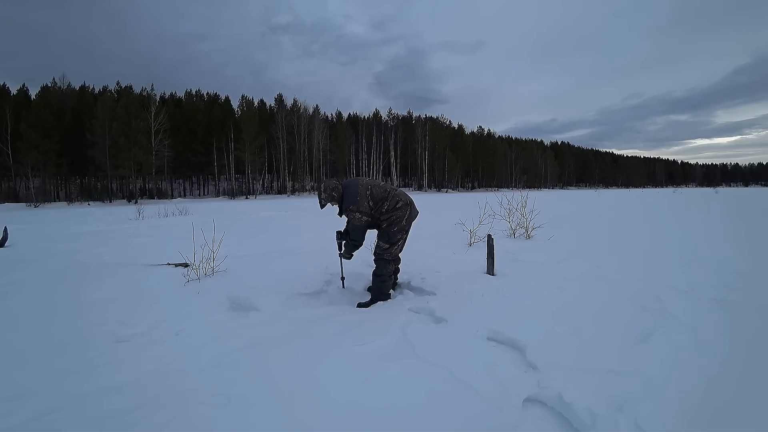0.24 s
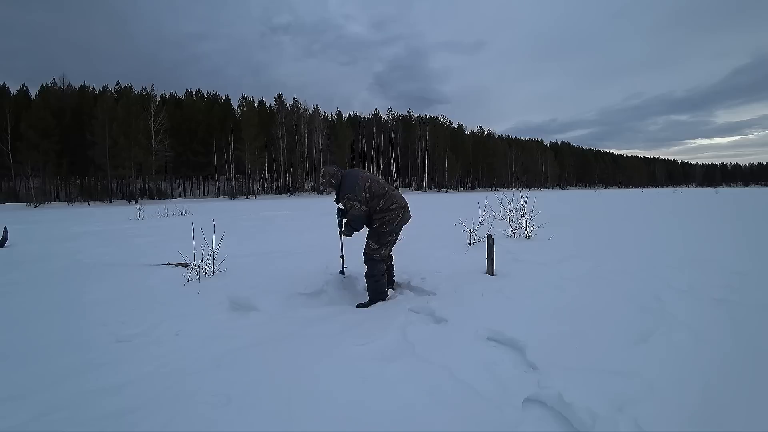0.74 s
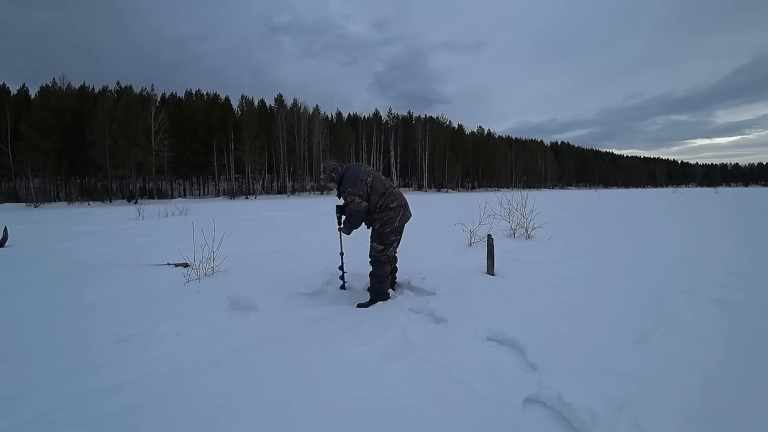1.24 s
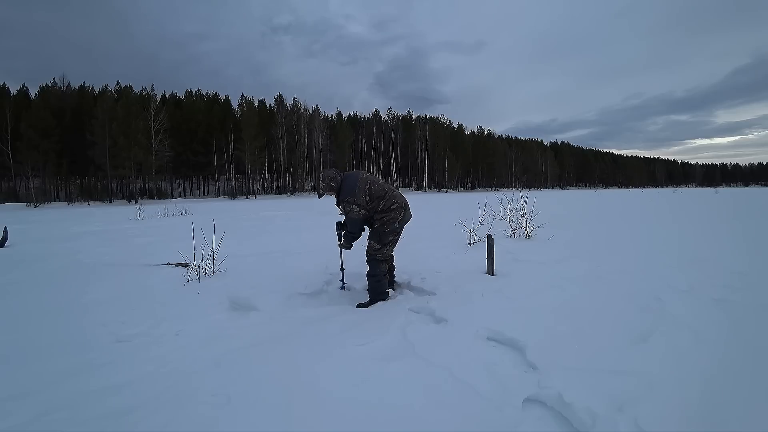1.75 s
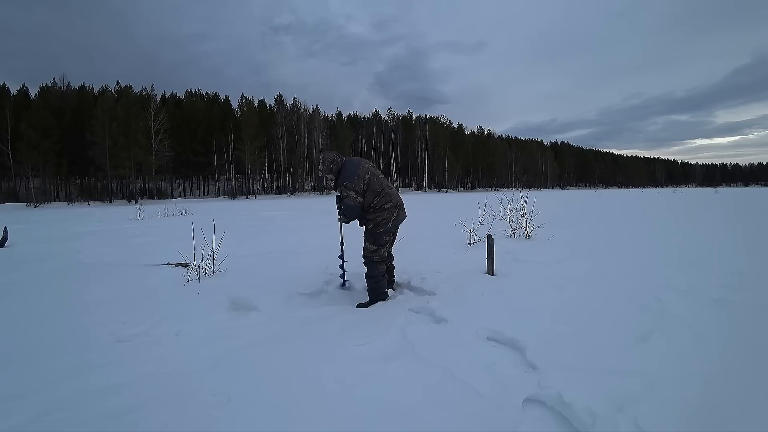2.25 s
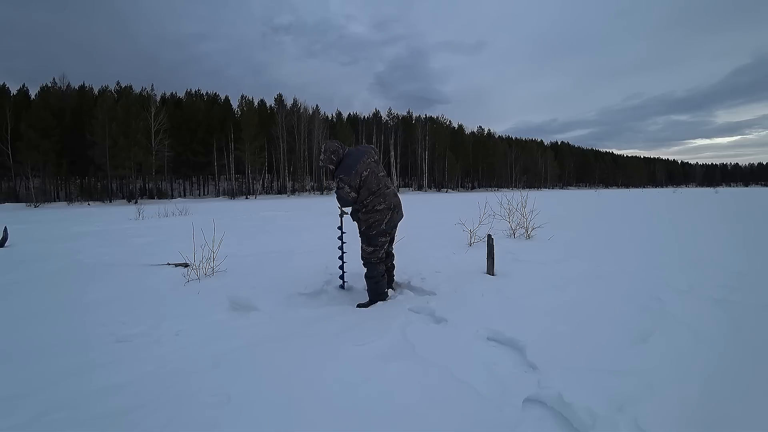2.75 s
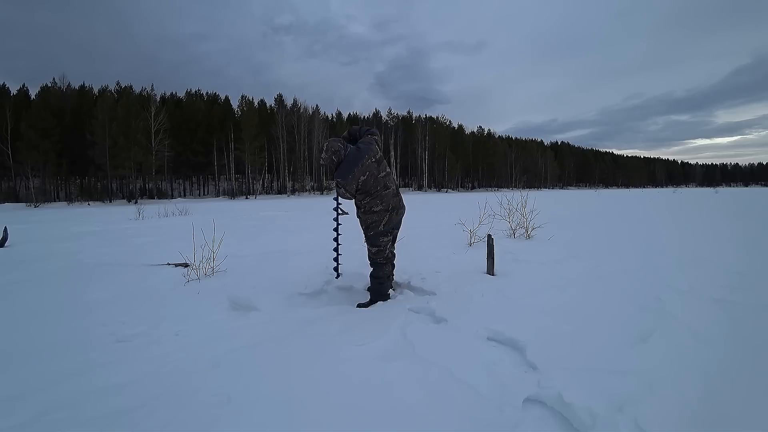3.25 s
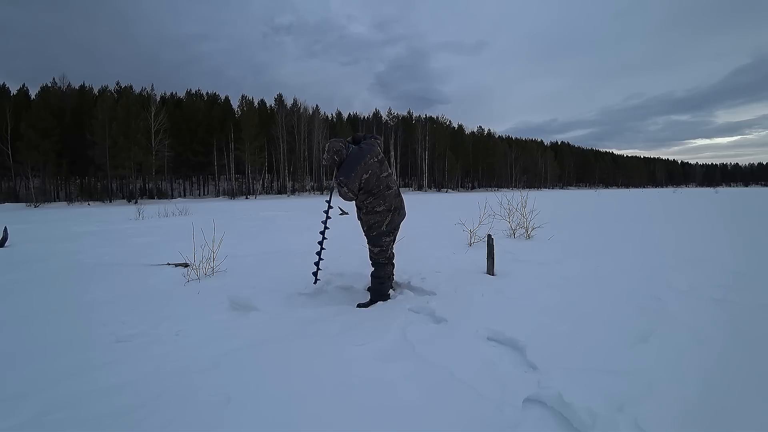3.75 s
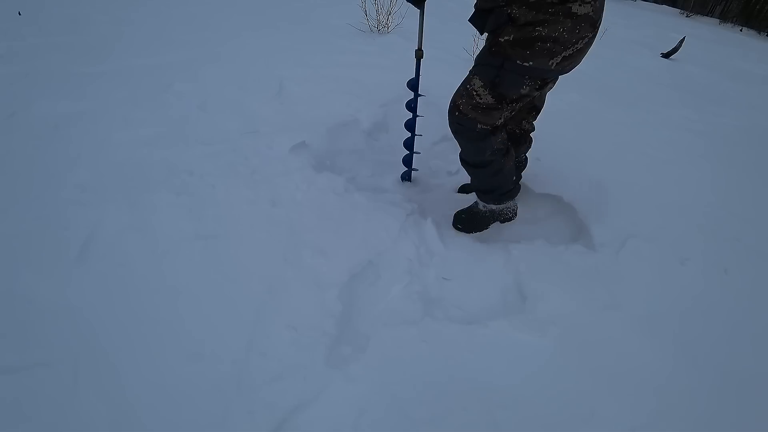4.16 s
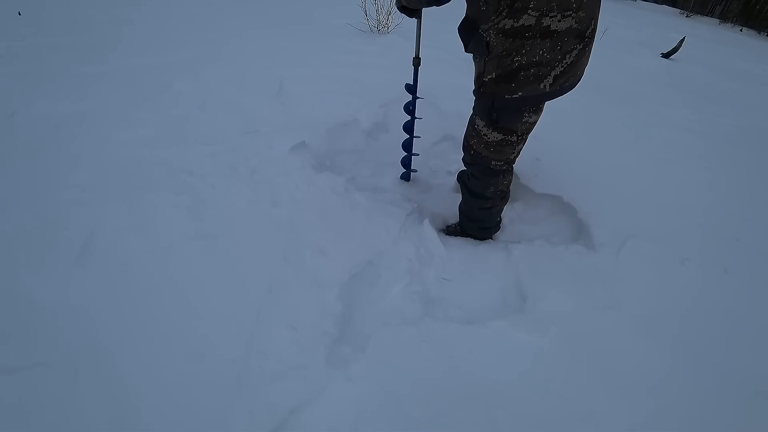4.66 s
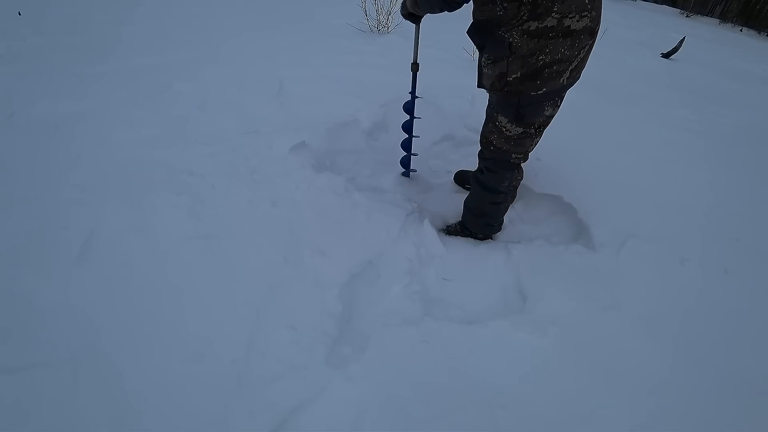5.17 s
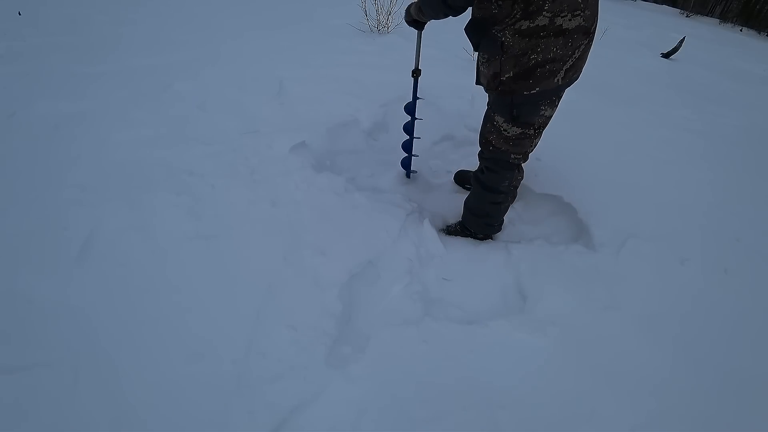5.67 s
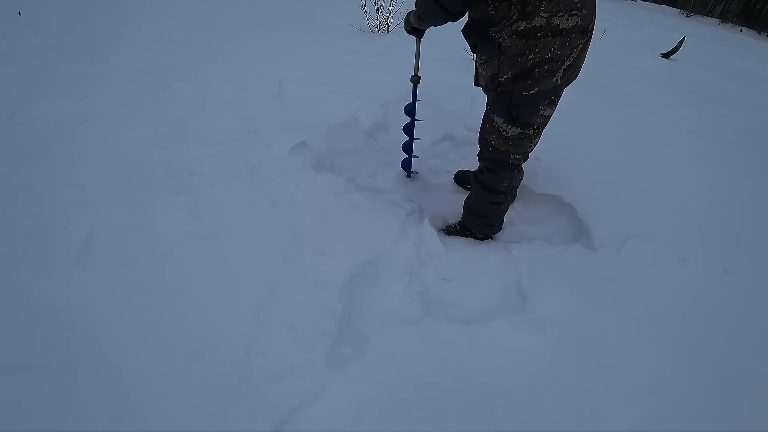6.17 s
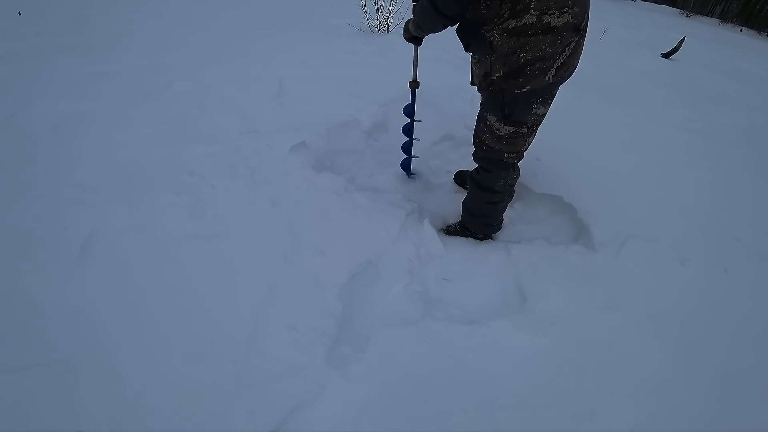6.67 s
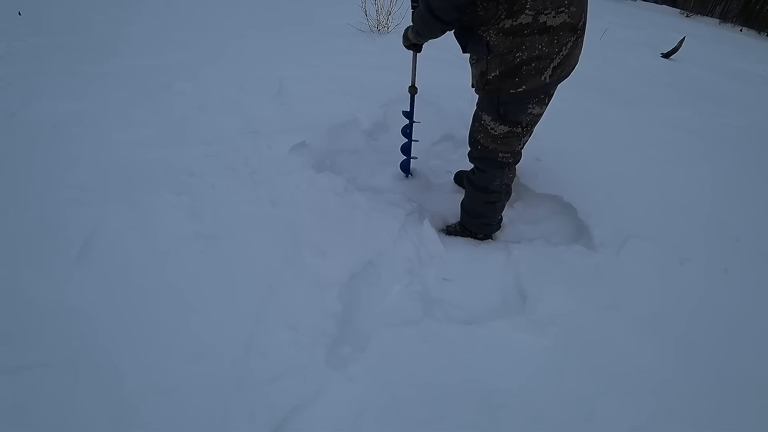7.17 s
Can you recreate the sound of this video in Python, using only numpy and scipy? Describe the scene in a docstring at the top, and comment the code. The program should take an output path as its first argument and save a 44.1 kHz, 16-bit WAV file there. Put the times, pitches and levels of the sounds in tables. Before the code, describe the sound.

An open, snowy lake with light wind rumble and very faint hiss. From a few metres away, a cordless drill whirs briefly at 0.0-0.2 s and again at 0.4-0.65 s, its gear whine rising fast and dropping as it brakes, with a few clicks. Wet slush splashes gather from 0.6 s, strongest and crunchiest around 1.2 s, with small bubbly plops. A longer whir at 1.65-2.4 s churns more watery, gritty bursts, peaking near 2.4 s. From 2.6 to 4.0 s it quiets to water pattering off the auger, light ticks and thinning drips. At 4.05 s it cuts abruptly to a close, far louder sound: continuous coarse ice shaving, a wobbling, raspy motor whine, low rumble and metallic ringing. From about 5.55 to 6.9 s, six fuzzy rising squeals repeat roughly four per second. Grinding continues, slightly easing, to the end near 7.4 s.

```python
"""Drill-driven ice auger

A cordless drill turns an ice auger on a frozen lake, in light wind.
From a few metres off, three motor bursts (swept gear and motor sines, fan noise) churn slush in a hole:
noise bursts for splashes, short gliding sines for bubbles, pattering noise for water off the auger.
Then, suddenly close, the drill runs under load (wobbling gear sines) while the blades shave fresh ice
(gritty noise, rung resonances); six squeals, one per auger turn, are rising fuzzy tones."""
import sys
import numpy as np
from scipy import signal
from scipy.fft import rfft, irfft
from scipy.io import wavfile
from scipy.ndimage import uniform_filter1d

SR = 44100
rng = np.random.default_rng(int(sys.argv[2]) if len(sys.argv) > 2 else 0)


def materialize(psi):
    """Save the field psi as 16-bit PCM at rate SR to the path in sys.argv[1].

    A 1-D psi becomes a single channel; in a 2-D psi each row is a channel.
    """
    bounded = np.clip(np.atleast_2d(psi).T, -1, 1)
    quanta = np.round(bounded * 32767).astype(np.int16)
    wavfile.write(sys.argv[1], SR, quanta)


N = 326781
TIME_S = np.arange(N) / SR
CLOSE_S = 4.049  # the close view begins
EDGE_HZ = 11030

# Table levels are nominal: the functions add trims and fluctuation.
# Spectra, each row: frequency in Hz, relative density in dB per Hz.

# Trigger pulls. Each row: half speed reached in seconds, let go in seconds, top gear-mesh pitch in Hz,
# sag as the finger eases (0-1), level in dB, gear whine in relative dB, brake current in relative dB.
BURSTS = [(0.022, 0.213, 3306, 0.12, -41.5, -8, 15), (0.388, 0.651, 3215, 0.11, -41, -6, 8),
          (1.669, 2.378, 3234, .13, -41, -9, 0)]
# Gear partials. Each row: multiple of the gear-mesh pitch, level in dB.
GEAR_PARTIALS = [(1 / 12, -8), (1 / 4, -9), (11 / 12, -10), (1 / 3, -8), (1, 1.5), (4 / 3, -7), (5 / 3, -7),
                 (2, -8)]
# Magnetic whine of the motor. Each row: multiple of the gear-mesh pitch, level in dB.
MOTOR_PARTIALS = [(1 / 3, -17.5), (2 / 3, -20.5), (13 / 12, -21), (4 / 3, -17), (3 / 2, -26), (7 / 4, -15)]
# Motor case response. Each row: frequency in Hz, gain in dB.
MOTOR_CASE = [(400, -11.5), (680, -13.5), (950, 2.5), (1300, -9), (1900, -4.5), (2900, 3), (3700, -7.5),
              (6000, -5)]
# Fan and brush spectrum. Each row: frequency in Hz, density in dB per Hz.
WHIRR_SPECTRUM = [(120, -52), (200, -9.5), (266, -11), (325, -18), (538, -8), (904, -13.5), (1050, -6.5),
                  (1200, -10.5), (1860, -13), (2060, -15.5), (2430, -8.5), (3130, -3.5), (3640, -2.5),
                  (5170, 1.5), (6600, -2), (7800, -15.5), (11000, -20), (14300, -51), (22000, -120)]
# Speed controller resonances. Each row: frequency in Hz, width in Hz, level in dB.
CHOPPER_MODES = [(2450, 300, 1), (4260, 1100, -4)]
# Drill under load. Each row: time in seconds, gear-mesh pitch in Hz,
# levels of the first, second and third partial in dB.
LOADED = [(4.05, 2570, -48, -41, -39.5), (4.55, 2573, -44, -56, -43), (4.95, 2580, -50, -36.5, -37),
          (5.35, 2560, -45.5, -44, -36.5), (5.53, 2546, -40, -39, -38), (5.7, 2566, -41, -39, -40),
          (6.45, 2566, -41.5, -36, -38), (7., 2541, -45, -39.5, -47), (7.41, 2514, -42.5, -38, -53)]

# Ice shaving spectrum. Each row: frequency in Hz, density in dB per Hz.
SCRAPE_SPECTRUM = [(200, -11.5), (400, -9), (750, -14), (1100, -6), (1500, -7), (1850, -9), (2300, -4),
                   (2700, -3), (3050, -0.5), (3250, -6), (3450, -0.5), (5400, -1), (6500, -2.5), (7500, -5),
                   (8800, -7.5), (9700, -14.5), (11000, -14)]
# Auger bending modes. Each row: frequency in Hz, width in Hz, level in dB.
AUGER_MODES = [(867, 9.6, -12.5), (984.5, 30, -3.5), (1209, 34, -5.5)]
# Blade resonances. Each row: frequency in Hz, width in Hz, level in dB.
BLADE_MODES = [(4380, 430, -4), (4869, 150, -5.5), (5370, 190, -6.5), (5900, 120, -25)]
# Blade ringing. Each row: time in seconds, level in dB.
BLADE_RING = [(4.05, -64), (4.9, -38.5), (5.5, -36), (6.5, -43.5), (6.8, -36.5), (7.41, -33)]
# Low rumble spectrum. Each row: frequency in Hz, density in dB per Hz.
RUMBLE_SPECTRUM = [(12, -35), (20, -1), (107, 2.5), (188, 1), (375, -13), (420, -13), (550, -17),
                   (920, -120)]
# Ground rumble. Each row: time in seconds, level in dB.
GROUND_RUMBLE = [(4.05, -35), (4.25, -37.5), (4.6, -44.5), (5.05, -38.5), (5.5, -42), (6.4, -46.5),
                 (6.85, -43.5), (7.3, -41)]
# Boring sounds as the blades sink in. Each one: level at the start in dB, change in dB per second.
CUTTING = (-25.5, -0.68)
AUGER_RINGING = (-38, -2.1)
SHAFT_HUM = (-47, 1.43)

# Big clumps of slush thrown by the auger. Each row: start in seconds, spray peak in dB,
# watery low part in relative dB, icy snap in relative dB, spray rise time in seconds.
SPLASHES = [(.207, -45.5, -2.5, -29, 0.011), (.618, -42, -7, -30, 0.011), (.7015, -44.5, 0, -25, 0.0093),
            (.725, -38.5, -13, -28, 0.01), (0.822, -39.5, -7.5, -26, 0.0087), (0.856, -46, -4, -22, 0.0077),
            (0.907, -37, -13, -8, 0.0041), (.934, -42, -8, -25, 0.0054), (1.069, -49, -13, -9, .005),
            (1.091, -41, -28, -10.5, 0.0067), (1.111, -37.5, -11, -7, 0.008),
            (1.163, -33.5, -15, -13, 0.0053), (1.2, -30, -15.5, -7.5, 0.0096),
            (1.245, -33.5, -10.5, -7, 0.0085), (1.2925, -32.5, -9.5, -22, 0.0075),
            (1.335, -37, -9, -23, 0.013), (1.372, -46, 6, -24, 0.0077), (1.446, -43.5, 4.5, -22, 0.0066),
            (1.477, -43, -1, -20, 0.0083), (1.749, -36, -4, -23, 0.0069), (1.882, -34, -6, -24, 0.016),
            (1.993, -36.5, -10, -34, 0.011), (2.061, -32, -10.5, -28, 0.0093),
            (2.107, -34, -3.5, -26, 0.01), (2.141, -32, -17, -33.5, 0.0075), (2.259, -40, -11, -23, 0.0099),
            (2.305, -33.5, -9.5, -22, 0.0092), (2.338, -33, -18, -22, 0.0089),
            (2.375, -27, -12, -29, 0.011), (2.411, -35, -4.5, -26, 0.018), (2.461, -30, -12, -28, 0.0087),
            (2.49, -36, -12, -26, 0.01), (2.584, -36.5, -16, -23, 0.0095)]
# Spells in which the flights fling small clumps. Each row: start in seconds, stop in seconds.
CHURN = [(.5, .79), (1.25, 1.6), (1.801, 2.56)]
# Spray spectrum. Each row: frequency in Hz, density in dB per Hz.
SPRAY_SPECTRUM = [(710, -18), (1200, -1.5), (1530, -3), (1640, -2), (2070, 1.5), (2640, 0.5), (3300, 5.5),
                  (3750, -2), (4600, 2.5), (6430, -5.5), (8720, -15), (9480, -20), (11000, -15.5),
                  (14300, -49), (22000, -120)]
# Spectrum of the water in the hole. Each row: frequency in Hz, density in dB per Hz.
SLOP_SPECTRUM = [(71, -32), (120, -1), (273, 2), (386, -5), (515, 3.5), (836, 2), (1040, 4.5), (1650, -3.5),
                 (1900, -18), (2470, -26), (4180, -120)]
# Largest air pockets and drips in the hole. Each row: start in seconds, initial pitch in Hz, peak in dB.
BUBBLES = [(.056, 199, -45.5), (.644, 813, -46), (.936, 1570, -39), (1.172, 1160, -34.5),
           (1.208, 1404, -34), (1.362, 247, -45.5), (1.384, 526, -48), (1.478, 750, -42),
           (1.811, 1620, -37), (2.073, 1316, -37), (2.117, 613, -40.5), (2.382, 1330, -33.5),
           (2.418, 1490, -39), (2.465, 1224, -38), (2.605, 1280, -33), (2.608, 948, -44),
           (3.374, 1020, -58), (3.508, 1100, -59)]
# Clicks of trigger, chuck and ice chips. Each row: start in seconds, level in dB.
TICKS = [(.268, -40), (.3243, -46), (.6736, -37.5), (1.642, -42), (2.687, -44), (2.9243, -47), (3.302, -45),
         (3.3286, -50), (3.416, -48), (3.509, -47.5), (3.562, -45)]
# Surges of water and slush off the auger. Each row: start in seconds, length in seconds, level in dB.
RUNOFF = [(-.1, 0.31, -49), (0.693, .29, -49), (1.11, 0.26, -42.5), (1.71, 0.81, -43.5),
          (2.544, 0.16, -48.5), (2.704, .1, -46.5), (2.8, .17, -51), (3.137, 0.21, -53.5),
          (3.36, 0.11, -54.5)]
# Running water spectrum. Each row: frequency in Hz, density in dB per Hz.
TRICKLE_SPECTRUM = [(290, -33), (500, -1.5), (623, -5.5), (817, -4), (1130, 1.5), (1430, -1.5), (2300, 2),
                    (4750, 4), (5060, 5), (7000, -5.5), (11000, -7.5), (14300, -43), (22000, -120)]

# Wind spectrum. Each row: frequency in Hz, density in dB per Hz.
WIND_SPECTRUM = [(8.8, -44), (15, -2), (38, -2), (91, -7.5), (158, -17.5), (209, -31), (222, -24),
                 (300, -29.5), (390, -65), (660, -120)]
# Gusts. Each row: time in seconds, level in dB.
GUSTS = [(0, -59.5), (.8, -54.5), (1.2, -55), (2.25, -55), (2.5, -50), (3.55, -56), (3.68, -49),
         (4.02, -54)]
# Hiss spectrum. Each row: frequency in Hz, density in dB per Hz.
HISS_SPECTRUM = [(120, -24), (200, 0.5), (229, -15.5), (372, -9), (404, -3), (433, -9), (752, -17.5),
                 (5170, -34), (6650, -34), (8130, -26), (11000, -41), (14300, -71), (22000, -120)]
# Two microphone ports, one entry per view. Three lists of rows: frequency in Hz, likeness (clipped to 0-1);
# frequency in Hz, lead of the left in radians; frequency in Hz, left minus right in dB.
FAR_PORTS = ([(60, 1), (170, 0.55), (500, 0.85), (1420, 1.2), (4080, 1.2), (11700, 1)], [(0, -1),
             (520, 0.61), (5940, 0.21), (7580, 0.65), (11900, -1)], [(60, 0.5), (170, 2.5), (500, 2),
             (1420, 1.5), (4080, 1), (11700, 1.0)])
CLOSE_PORTS = ([(60, 1), (140, 0.96), (350, 0.33), (840, 0.9), (2020, 0.93), (4870, 1), (11700, 0.74)],
               [(0, -1.3), (340, 1.23), (600, 0.3), (950, 0.3), (9730, -0.42), (10600, -0.1), (11900, 0.0)],
               [(60, 0.5), (140, 1.0), (350, 0.63), (840, 0.87), (2020, 0.13), (4870, 0.76), (11700, -1.7)])

# Speed climbs an S-curve, sags late, dies away under the brake.
SPIN_UP_S, BRAKE_S, SAG_POWER = .027, 0.056, 4.1
# Level grows with speed, and again while the motor accelerates.
LOUDNESS_POWER, SURGE_DB = 2.2, 11
IDLE_CURRENT_DB, START_CURRENT_DB = -2, 4.5  # motor whine, running free and starting
SHAFT_DB = -13.5  # each of the weaker multiples of the shaft speed
MESH_PER_SHAFT = 12  # gear-mesh cycles per shaft turn
PULL_S, CHOPPER_DB = .057, -55.5  # buzz from the trigger pull, fading through half speed
SQUEAL_FROM_S, AUGER_TURN_S, SQUEAL_S = 5.55, .237, .19
SQUEAL_START_HZ, SQUEAL_END_HZ, SQUEAL_DB = 2713, 3060, -38
SMALL_PER_S, SMALL_SPREAD_DB = 17.73, 8  # small clumps
SMALL_LOW_DB, SMALL_SNAP_DB, SMALL_RISE_S = -7, -15, 0.0079
TICK_DECAY_S = 0.005
FLOW_ATTACK_S, FLOW_RELEASE_S = 0.05, 0.078
DRIP_DB, DRIP_END_S = -57.5, 3.58  # dripping weakens as the auger is swung clear of the hole
HISS_DB = -68.5
SCATTER_S = 0.042  # decay of the scatter off the snow


def amp(db):
    """Decibels to gain."""
    return 10 ** (np.asarray(db) / 20)


def unit(x):
    """Scales to rms 1."""
    return x / np.sqrt(np.mean(x ** 2) + 1e-20)


def curves(rows):
    """Interpolates each column of a table of (s, ..) rows at every sample."""
    row_s, *columns = np.transpose(rows)
    return [np.interp(TIME_S, row_s, column) for column in columns]


def over_log_hz(hz, rows):
    """Interpolates (Hz, value) rows on a near-logarithmic frequency axis."""
    row_hz, values = np.transpose(rows)
    return np.interp(np.log1p(hz), np.log1p(row_hz), values)


def colour(x, spectrum):
    """Filters by a spectrum of (Hz, dB) points."""
    hz = np.fft.rfftfreq(N, 1 / SR)
    return irfft(rfft(x) * amp(over_log_hz(hz, spectrum)), N)


def wander(rate_hz):
    """Slow random signal of rms 1, up to about the given rate."""
    hz = np.fft.rfftfreq(N, 1 / SR)
    lowpass = (hz > 0) / (1 + (hz / rate_hz) ** 4)
    return unit(irfft(rfft(rng.standard_normal(N)) * lowpass, N))


def patchy_noise(patchy_db, size):
    """White noise whose level varies in patches of size (bins, frames)."""
    bins = signal.stft(rng.standard_normal(N), nperseg=256, noverlap=192)[2]
    patches = uniform_filter1d(rng.standard_normal(bins.shape), size[0], axis=0)
    patches = uniform_filter1d(patches, size[1], axis=1)
    noise = signal.istft(bins * amp(patchy_db * unit(patches)), nperseg=256, noverlap=192)[1]
    return unit(noise[:N])


def crackle(per_s, spread_db):
    """Sparse clicks, a few much larger than the rest."""
    sizes = amp(spread_db * np.minimum(rng.exponential(1, N), 4))
    signs = rng.choice([-1, 1], N)
    return unit(sizes * signs * (rng.random(N) < per_s / SR))


def ring(x, modes):
    """Drives resonances (Hz, width Hz, dB); each comes out at its own level."""
    out = np.zeros(N)
    for hz, width_hz, db in modes:
        pole = np.exp((2j * hz - width_hz) * np.pi / SR)
        out += amp(db) * unit(signal.lfilter([1, 0, -1], [1, -2 * pole.real, abs(pole) ** 2], x))
    return out


def add(mix, start_s, sound):
    """Mixes a sound in at a start time."""
    part = mix[max(round(start_s * SR), 0):][:len(sound)]
    part += sound[:len(part)]


def partials(angle_rad, orders):
    """Sines of random phase on multiples of a turning angle."""
    return sum(amp(db) * np.sqrt(2) * np.sin(k * angle_rad + 2 * np.pi * rng.random()) for k, db in orders)


def free_drill(whirr_db=-1, throb=0.17):
    """Gear lines and fan whirr sound through the housing; the motor sings on starting and braking current."""
    gears, motor, level, turn, pulling = np.zeros((5, N))
    shaft = [(k / MESH_PER_SHAFT, SHAFT_DB) for k in (9, 10, 13, 14, 15, 17, 18, 19, 21, 22, 23, 25)]
    unsteady = 1 + .003 * wander(rate_hz=260)
    for start_s, stop_s, top_hz, sag, db, gear_db, brake_db in BURSTS:
        on = (TIME_S > start_s - 4 * SPIN_UP_S) & (TIME_S < stop_s + 2 * BRAKE_S)
        t = TIME_S[on]
        spun = 1 / (1 + np.exp((start_s - t) / SPIN_UP_S))
        eased = 1 - sag * np.clip((t - start_s) / (stop_s - start_s), 0, 1) ** SAG_POWER
        speed = spun * eased * np.exp(-np.maximum(t - stop_s, 0) / BRAKE_S)
        accelerating = (4 * spun * (1 - spun)) ** 2
        braking = np.clip((t - stop_s) / .004, 0, 1)
        current = amp(IDLE_CURRENT_DB) + amp(START_CURRENT_DB) * accelerating + amp(brake_db) * braking
        angle_rad = 2 * np.pi * np.cumsum(top_hz * speed * unsteady[on]) / SR
        loud = amp(db + SURGE_DB * accelerating) * speed ** LOUDNESS_POWER
        level[on] += loud
        pulling[on] += (t > start_s - PULL_S) * (1 - spun)
        turn[on] = np.cos(angle_rad / MESH_PER_SHAFT)
        # the gears whine most near full speed
        gears[on] += loud * amp(gear_db) * speed * partials(angle_rad, GEAR_PARTIALS + shaft)
        motor[on] += loud * current * partials(angle_rad, MOTOR_PARTIALS)
    rattle = unit(amp(2 * wander(rate_hz=200)))
    whirr = unit(colour(patchy_noise(patchy_db=5.5, size=(2, 8)), WHIRR_SPECTRUM)) * (1 + throb * turn)
    buzz = amp(CHOPPER_DB) * pulling * ring(rng.standard_normal(N), CHOPPER_MODES)
    housed_gears = colour(gears * rattle, WHIRR_SPECTRUM)
    return housed_gears + colour(motor, MOTOR_CASE) + amp(whirr_db) * level * whirr + buzz


def loaded_drill():
    """The load shakes the motor speed, so the gear lines wobble and rasp."""
    mesh_hz, *partial_dbs = curves(LOADED)
    speed = 1 + .0065 * wander(rate_hz=15) + .006 * wander(rate_hz=170)
    angle_rad = 2 * np.pi * np.cumsum(mesh_hz * speed) / SR
    rasps = [amp(2.5 * wander(rate_hz=25) + 3.2 * wander(rate_hz=120)) for _ in partial_dbs]
    out = np.zeros(N)
    for k, (db, rasp) in enumerate(zip(partial_dbs, rasps), 1):
        out += amp(db) * unit(rasp * np.sin(k * angle_rad))
    return out


def sinking(db, db_per_s):
    """A gain that changes steadily as the hole deepens."""
    return amp(db + db_per_s * np.maximum(TIME_S - CLOSE_S, 0))


def boring(scrape_db=-1.57, chatter_db=-12, auger_db=-2.5, hum_db=-2, throb=0.1, grit=0.54,
           swell_db=1.5, curl_db=-1.5):
    """The blades bite unevenly and chip the ice; the chips ring the blades and the steel shaft."""
    cut = sinking(*CUTTING) * amp(0.1 * wander(rate_hz=20))
    ringing = sinking(*AUGER_RINGING) * amp(swell_db * wander(rate_hz=6.4))
    hum = sinking(*SHAFT_HUM) * amp(swell_db * wander(rate_hz=18))
    rumble = amp(curves(GROUND_RUMBLE)[0])

    turn = np.cos(2 * np.pi * np.cumsum(curves(LOADED)[0] / MESH_PER_SHAFT) / SR)
    bite = amp(.7 * wander(rate_hz=70)) * (1 + throb * turn)
    curls = patchy_noise(patchy_db=4.5, size=(2, 36))  # long shavings hold their pitch for a moment
    shavings = unit(patchy_noise(patchy_db=3.5, size=(2, 9)) + amp(curl_db) * curls)
    chips = bite * (shavings + grit * crackle(per_s=5000, spread_db=6.0))
    ice = cut * amp(scrape_db) * unit(colour(chips, [(60, -40)] + SCRAPE_SPECTRUM))

    knocks = [rng.standard_normal(N) * amp(4.2 * wander(rate_hz=30)) for _ in range(2)]
    blades = amp(curves(BLADE_RING)[0]) * ring(knocks[0], BLADE_MODES)
    chatter = cut * ring(knocks[1], [(3960, 190, chatter_db)])
    auger = amp(auger_db) * ringing * ring(rng.standard_normal(N), AUGER_MODES)
    shaft = hum * ring(rng.standard_normal(N), [(546.4, 77, hum_db)])
    lumps = rng.standard_normal(N) * amp(2.25 * wander(rate_hz=14))
    thuds = rumble * unit(colour(lumps, RUMBLE_SPECTRUM))
    return ice + blades + chatter + auger + shaft + thuds


def squeals(count=6, fuzzy=0.0301, rough_db=2.0):
    """A blade sticks and slips on the ice once a turn: a fuzzy, broken tone that climbs."""
    out = np.zeros(N)
    fuzz = 1 + fuzzy * wander(rate_hz=220) + .015 * wander(rate_hz=12)
    for k in range(count):
        u = np.clip((TIME_S - SQUEAL_FROM_S - k * AUGER_TURN_S) / SQUEAL_S, 0, 1)
        hz = (SQUEAL_START_HZ + (SQUEAL_END_HZ - SQUEAL_START_HZ) * u) * fuzz
        tone = np.sin(2 * np.pi * np.cumsum(hz) / SR)
        out += amp(SQUEAL_DB) * np.sqrt(8 * u * (1 - u)) * tone
    return out * unit(amp(rough_db * wander(rate_hz=54)))


def flow():
    """Strength of the running water: surges swell, hold and drain away over a drip."""
    over_hole = np.clip(1 - (TIME_S - DRIP_END_S) / .04, .35, 1)
    levels = []
    for start_s, length_s, db in RUNOFF:
        swell = np.clip((TIME_S - start_s) / FLOW_ATTACK_S, 0, 1)
        drain = np.exp(-np.maximum(TIME_S - start_s - length_s, 0) / FLOW_RELEASE_S)
        levels.append(amp(db) * swell * drain)
    levels.append(amp(DRIP_DB) * over_hole)
    return np.max(levels, axis=0) * np.sqrt(over_hole)


def small_clumps():
    """Rows like SPLASHES, at random moments while the auger churns; more water makes them louder."""
    water_db, rows = 20 * np.log10(flow()), []
    for start_s, stop_s in CHURN:
        for k, (jitter, size) in enumerate(rng.uniform(-1, 1, (40, 2))):
            s = start_s + (k + jitter / 2) / SMALL_PER_S
            if s < stop_s:
                db = water_db[round(s * SR)] + SMALL_SPREAD_DB * size
                rows.append((s, db, SMALL_LOW_DB, SMALL_SNAP_DB, SMALL_RISE_S))
    return rows


def slush(snap_db=-1, spray_db=-1, slop_db=-3, lag=1.55, grit=0.58):
    """Each clump bursts into gritty spray; the water in the hole answers a little more slowly."""
    (spray_power, slop_power, snap), t = np.zeros((3, N)), TIME_S[:SR // 6]
    for s, db, low_db, snap_rel_db, rise_s in SPLASHES + small_clumps():
        u = t / max(rise_s, .002)
        add(snap, s, amp(db + snap_rel_db) * 2 * u * np.exp(1 - 2 * u))  # the crust breaks first
        add(spray_power, s, (amp(db) * u * np.exp((1 - u ** 1.4) / 1.4)) ** 2)
        add(slop_power, s, (amp(db + low_db) * u / lag * np.exp(1 - u / lag)) ** 2)
    clumps = amp(1.6 * wander(rate_hz=300))
    drops = patchy_noise(patchy_db=4.5, size=(3, 6)) + grit * crackle(per_s=2200, spread_db=2.5)
    water = patchy_noise(patchy_db=6.5, size=(2, 10))
    cracks = colour(crackle(per_s=4800, spread_db=5.0), [(1000, -23), (6000, -16), (8000, 6), (11000, 2)])
    crust = amp(snap_db) * snap * unit(cracks)
    spray = amp(spray_db) * np.sqrt(spray_power) * unit(colour(clumps * drops, SPRAY_SPECTRUM))
    slop = amp(slop_db) * np.sqrt(slop_power) * unit(colour(water, SLOP_SPECTRUM))
    return crust + spray + slop


def bubbles(rise_cycles=7, max_rise_s=.011, glide_per_s=-0.46):
    """Air pockets ring briefly, sagging slightly in pitch as the hole opens."""
    out, t = np.zeros(N), TIME_S[:SR // 8]
    for s, hz, db in BUBBLES:
        u = t / min(rise_cycles / hz, max_rise_s)
        tone = np.sin(2 * np.pi * hz * t * (1 + glide_per_s * t))
        add(out, s, amp(db) * u * np.exp(1 - u) * tone)
    wobble = unit(1 + .7 * wander(rate_hz=110))
    return out * wobble


def runoff(water_db=-4):
    """Fine drops patter off the auger, with sharper clicks between them."""
    clicks, t = np.zeros(N), TIME_S[:SR // 12]
    for s, db in TICKS:
        add(clicks, s, amp(db) * (1 - np.exp(-t / .0004)) * np.exp(-t / TICK_DECAY_S))
    drops = patchy_noise(patchy_db=4, size=(3, 10)) + .8 * crackle(per_s=2000, spread_db=2.2)
    chips = patchy_noise(patchy_db=3.5, size=(3, 12))
    dribble = amp(1.1 * wander(rate_hz=50))
    water = amp(water_db) * flow() * unit(colour(drops * dribble, TRICKLE_SPECTRUM))
    return water + clicks * unit(colour(chips, TRICKLE_SPECTRUM))


def wind():
    """Lumpy low noise of wind on the microphone over a faint hiss."""
    lumps = unit(colour(rng.standard_normal(N), WIND_SPECTRUM) * amp(0.66 * wander(rate_hz=5.8)))
    hiss = unit(colour(rng.standard_normal(N), HISS_SPECTRUM))
    return amp(curves(GUSTS)[0]) * lumps + amp(HISS_DB) * hiss


def spread(x, likeness, lead, balance):
    """Sound reaches two ports a little apart; scatter off the snow reaches them with opposite sign."""
    t, hz = TIME_S[:SR // 4], np.fft.rfftfreq(N, 1 / SR)
    same = np.clip(over_log_hz(hz, likeness), 0, 1)
    left = amp(over_log_hz(hz, balance) / 2) * np.exp(.5j * over_log_hz(hz, lead))
    tail = rng.standard_normal(len(t)) * np.exp(-t / SCATTER_S)
    scatter = rfft(tail / np.linalg.norm(tail), N) * np.sqrt((1 - same) / (1 + same))
    ports = np.array([left + scatter, 1 / left - scatter])
    return irfft(rfft(x) * ports / (abs(left + 1 / left) / 2), N)


def scene():
    """The distant clearing of one hole gives way at once to the close boring of the next."""
    far = spread(free_drill() + slush() + bubbles() + runoff() + wind(), *FAR_PORTS)
    close = spread(boring() + loaded_drill() + squeals(), *CLOSE_PORTS)
    near = np.clip((TIME_S - CLOSE_S) / .007, 0, 1)
    return (1 - near) * far + near * close


def record(dry):
    """A steep low-pass band limit."""
    lowpass = signal.firwin(1601, EDGE_HZ, window=("kaiser", 8), fs=SR)
    return signal.oaconvolve(dry, lowpass[None], "same")


dry = scene()
out = record(dry)
materialize(out)
```